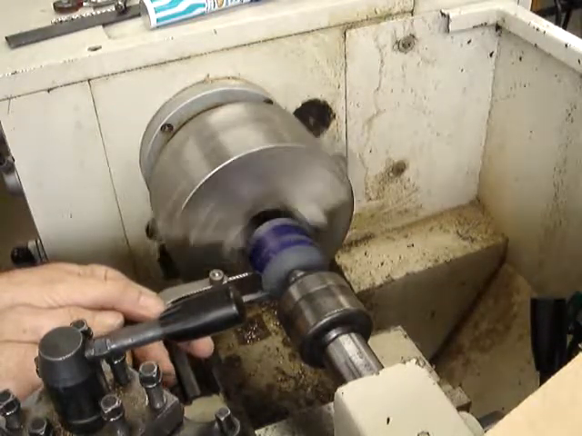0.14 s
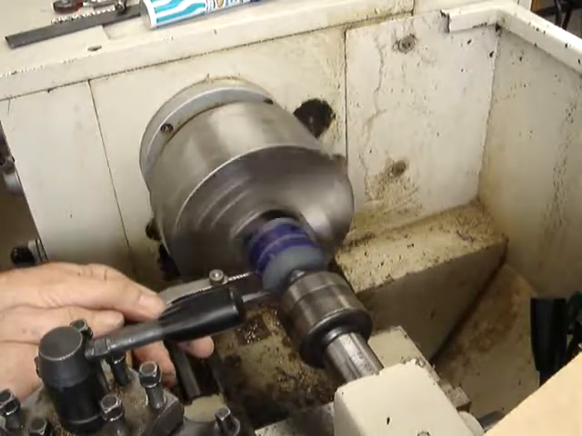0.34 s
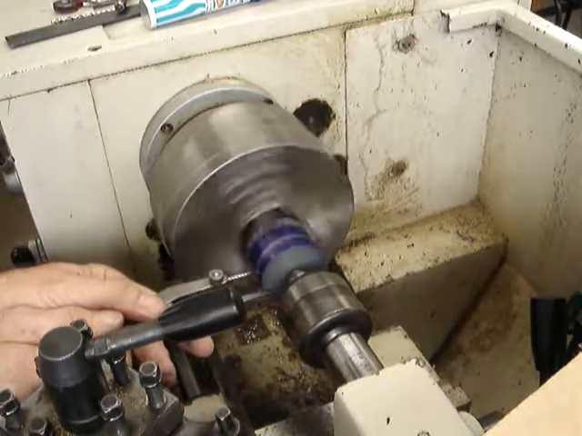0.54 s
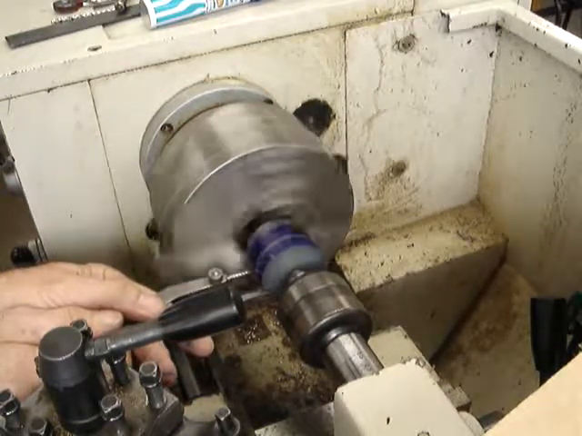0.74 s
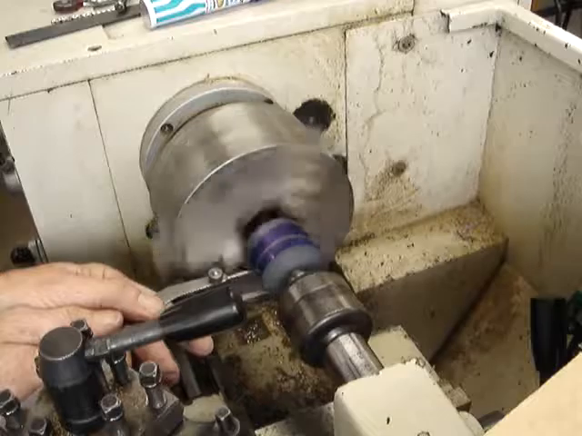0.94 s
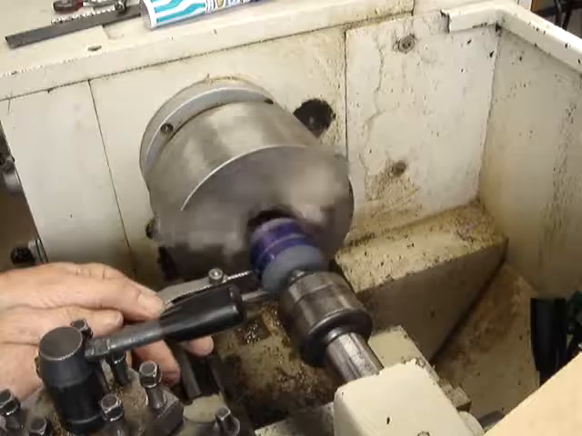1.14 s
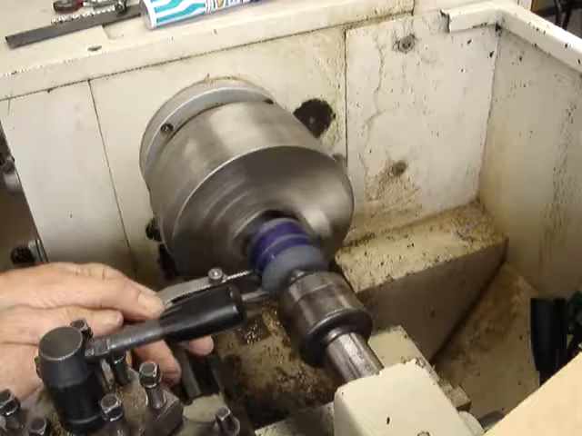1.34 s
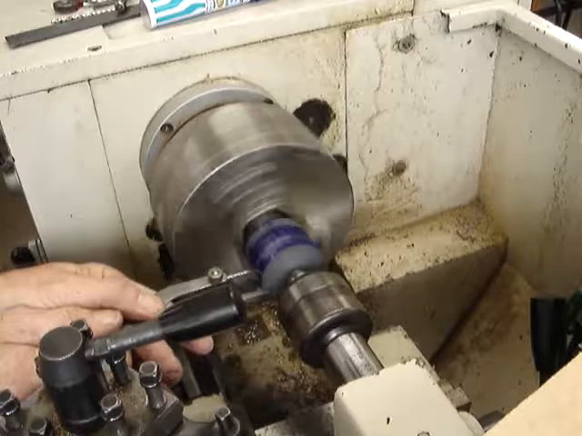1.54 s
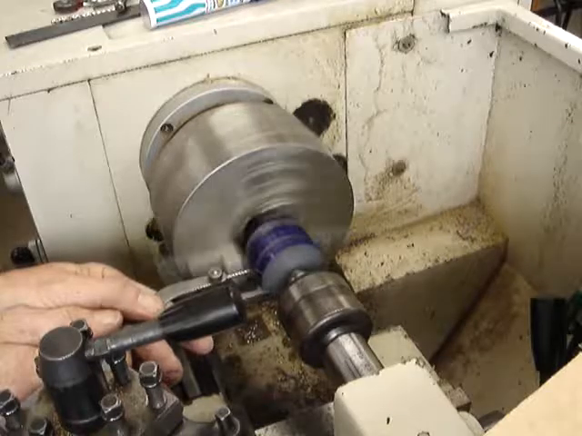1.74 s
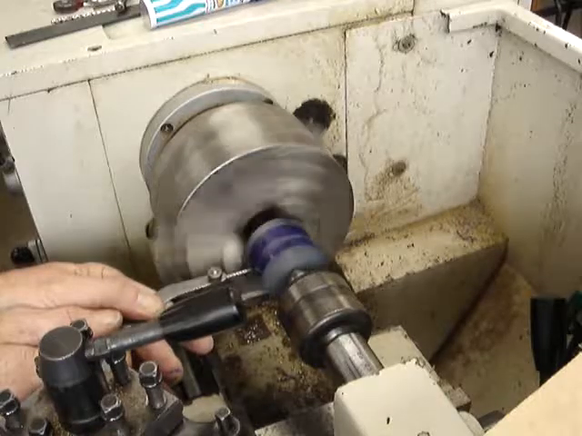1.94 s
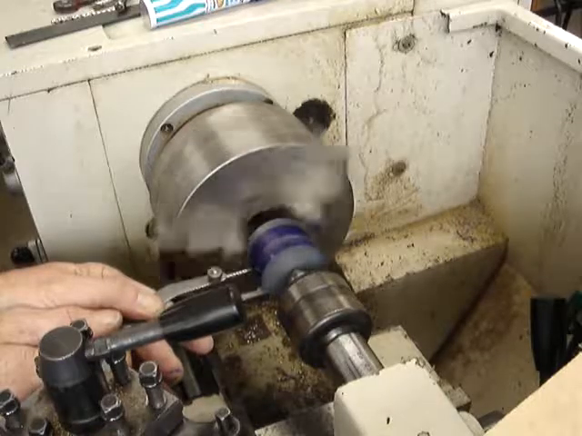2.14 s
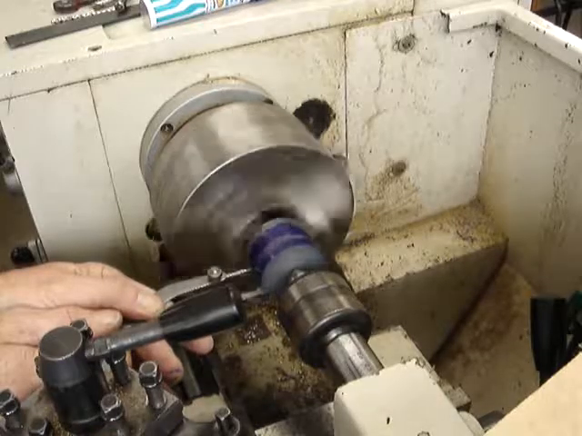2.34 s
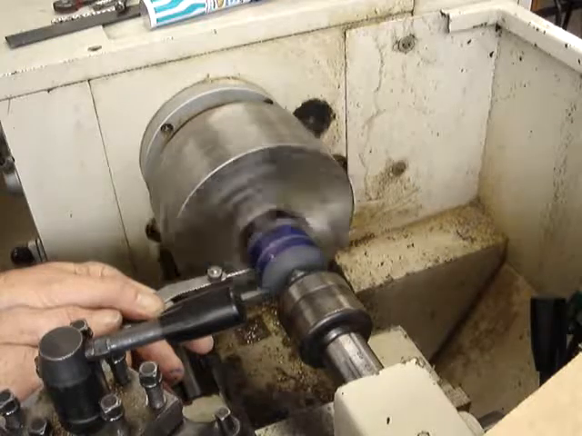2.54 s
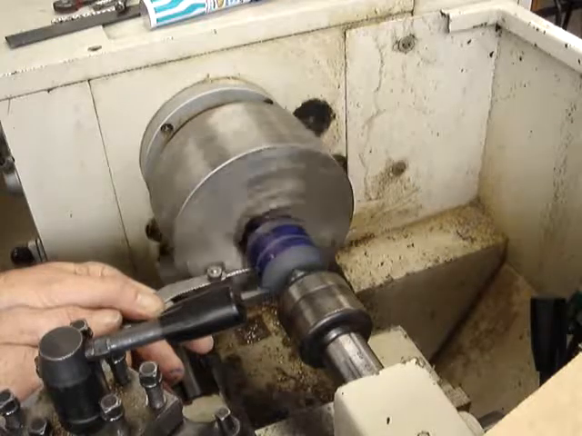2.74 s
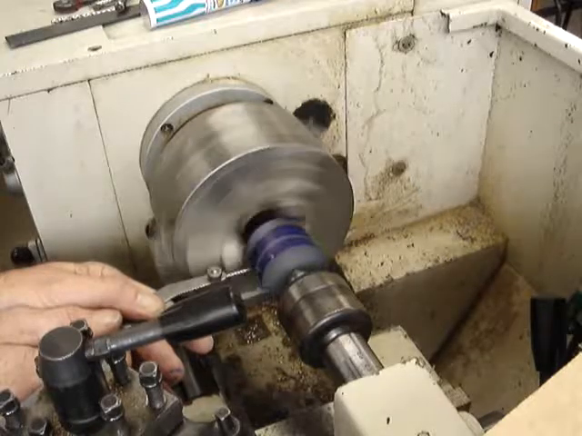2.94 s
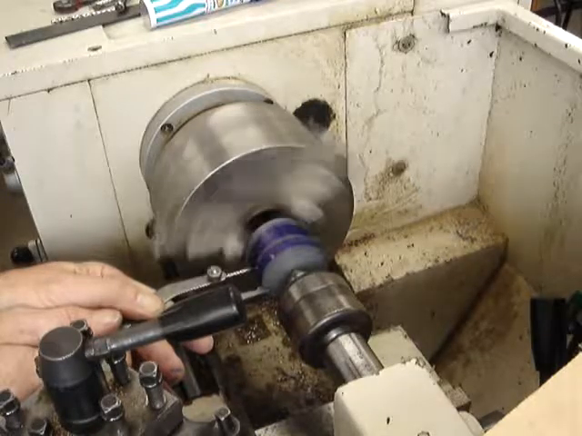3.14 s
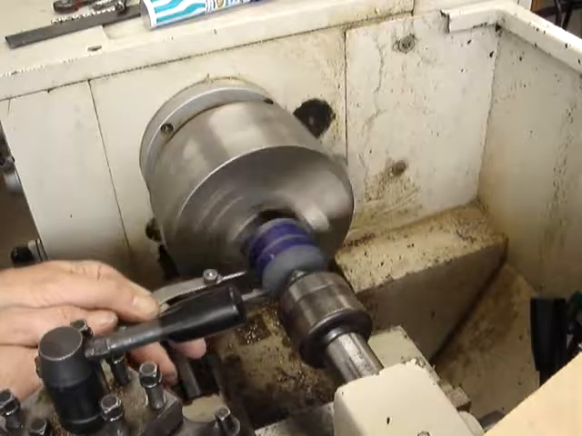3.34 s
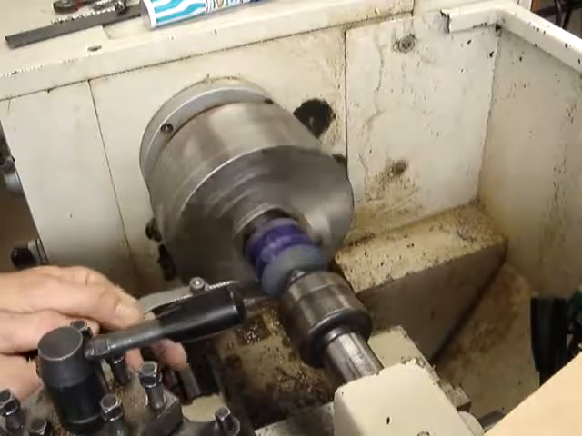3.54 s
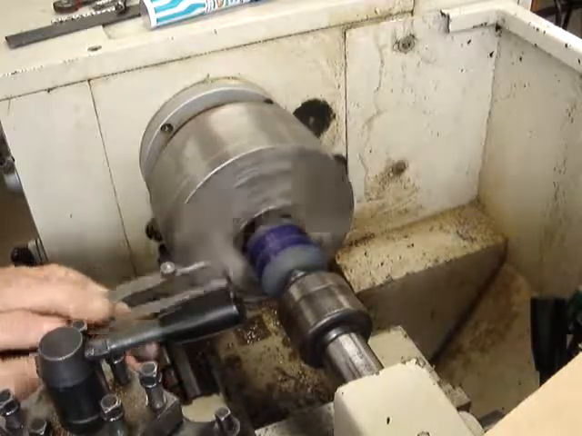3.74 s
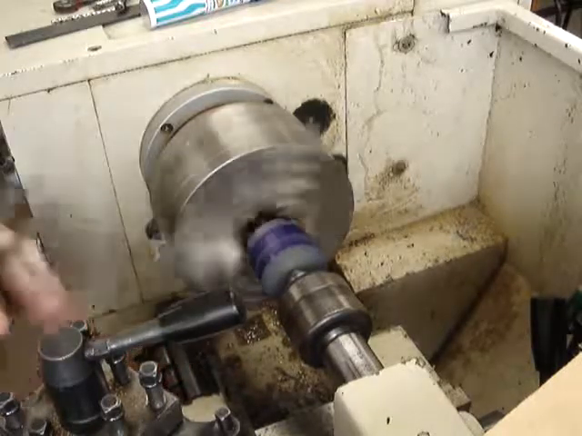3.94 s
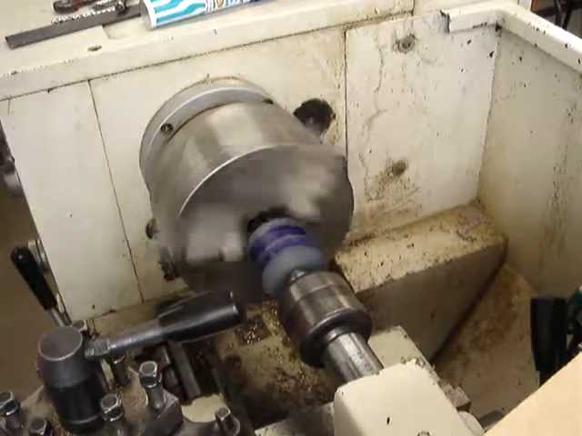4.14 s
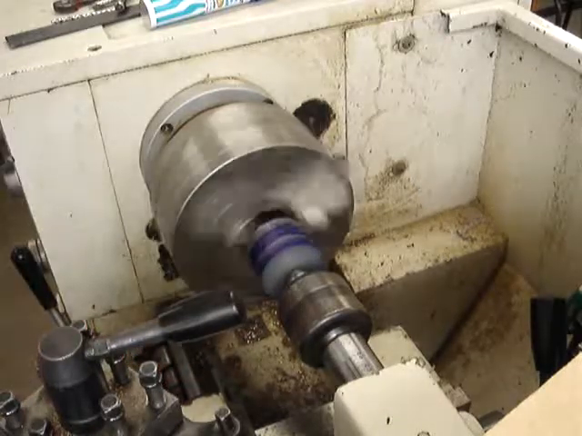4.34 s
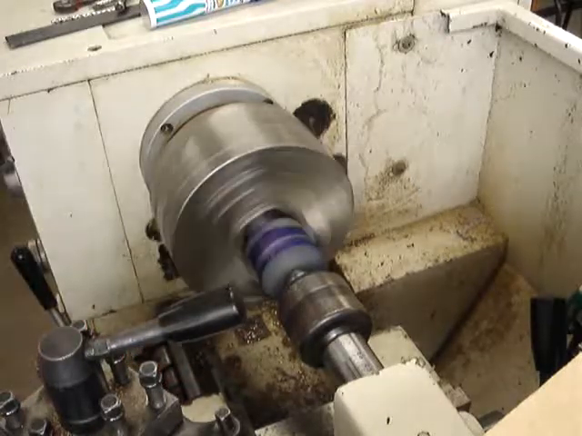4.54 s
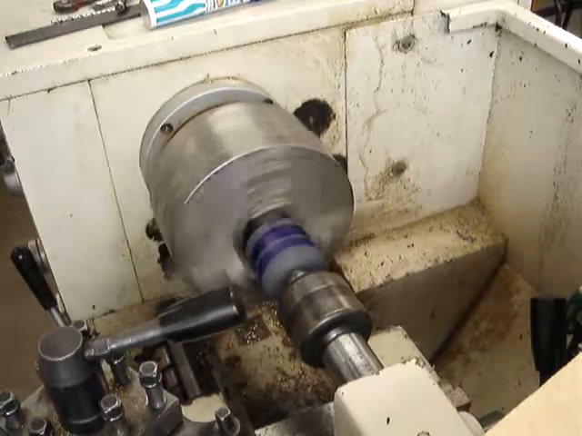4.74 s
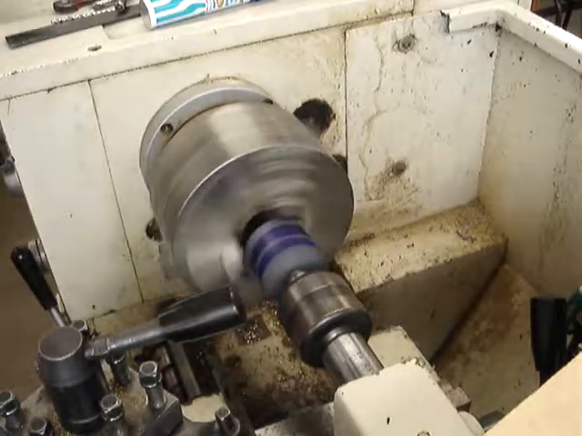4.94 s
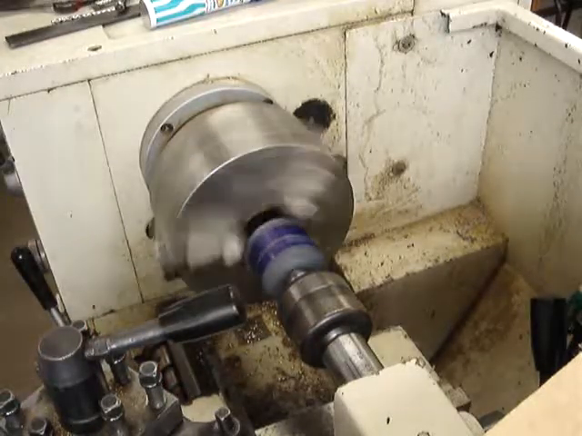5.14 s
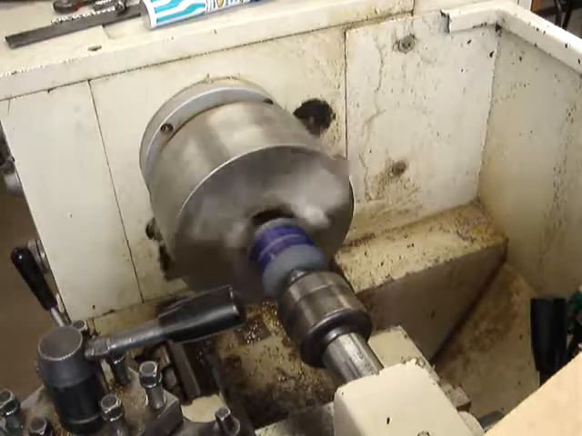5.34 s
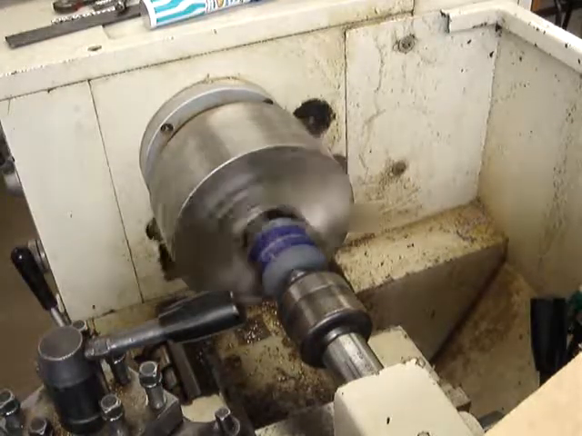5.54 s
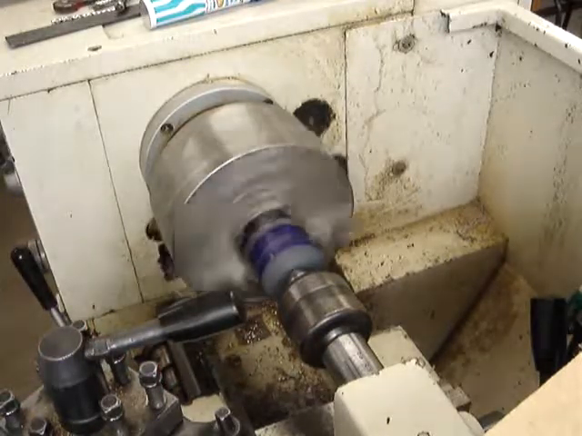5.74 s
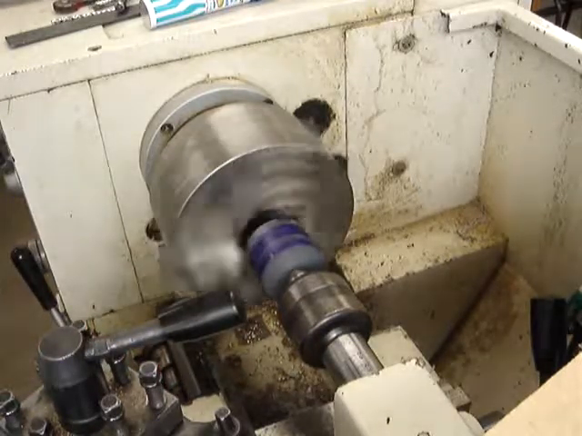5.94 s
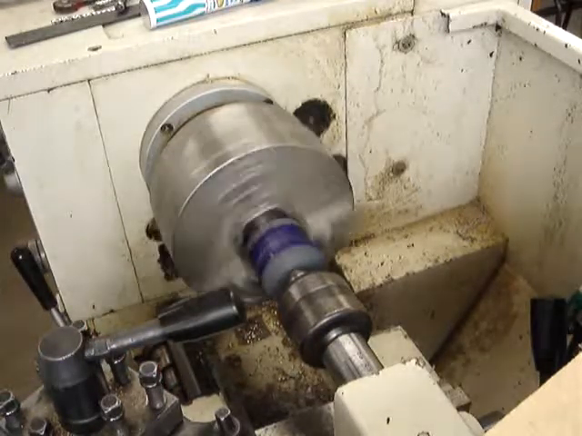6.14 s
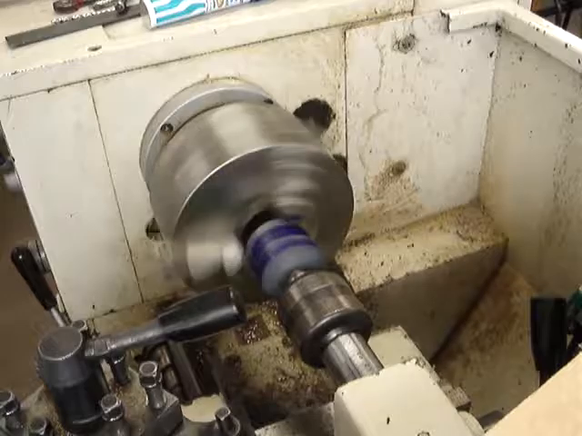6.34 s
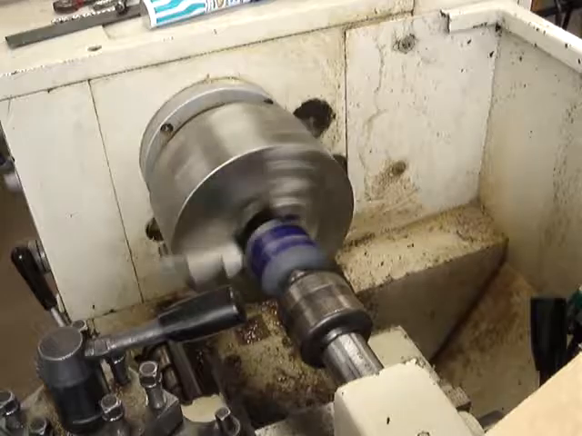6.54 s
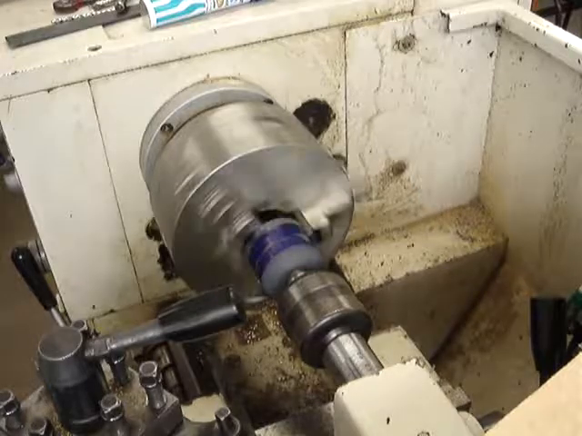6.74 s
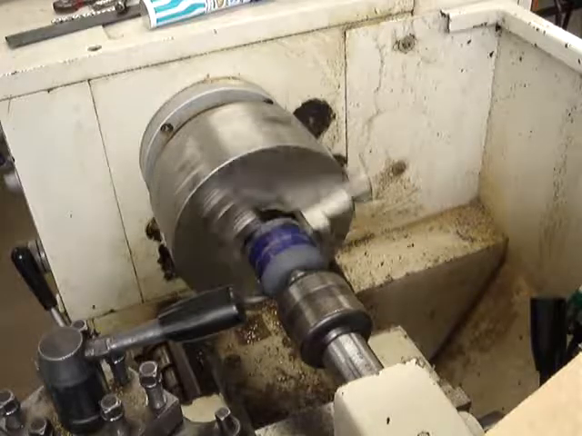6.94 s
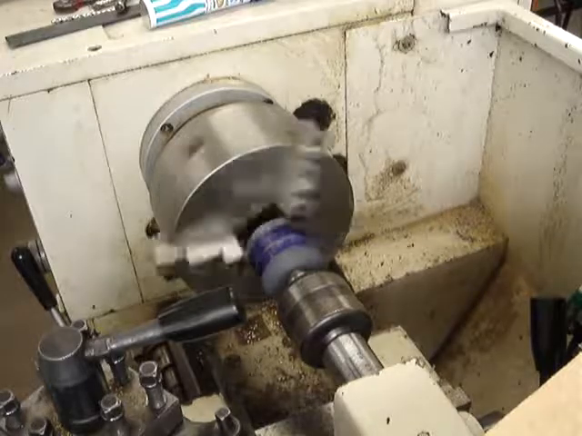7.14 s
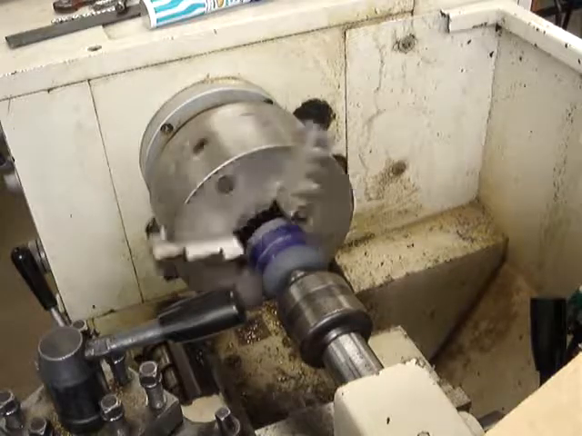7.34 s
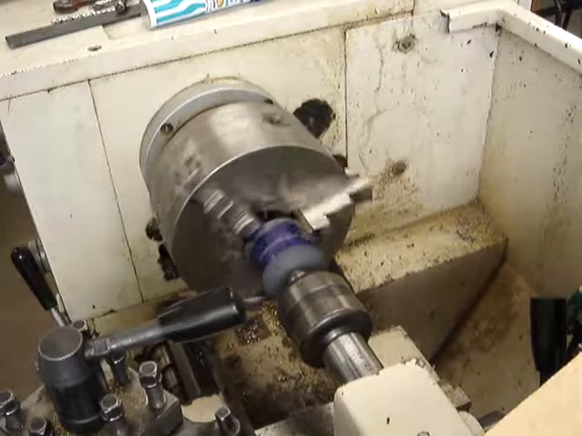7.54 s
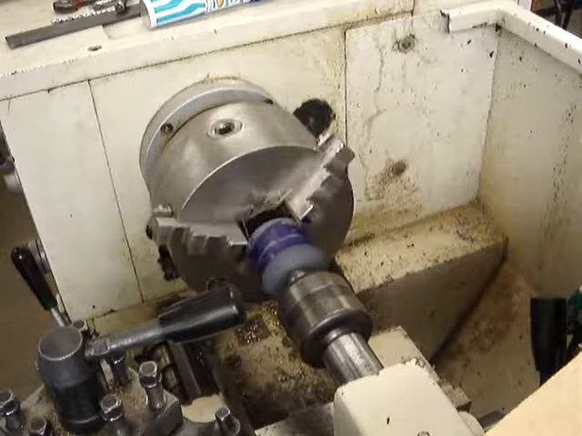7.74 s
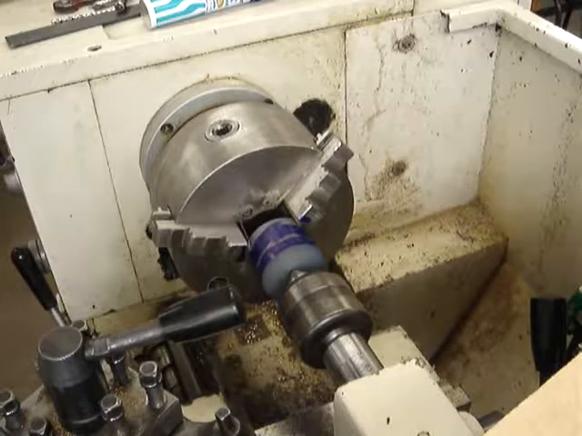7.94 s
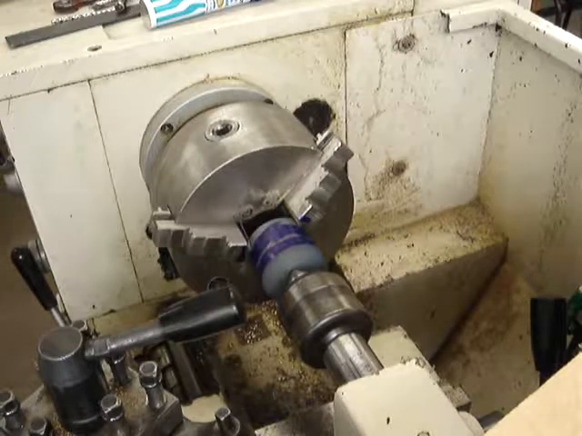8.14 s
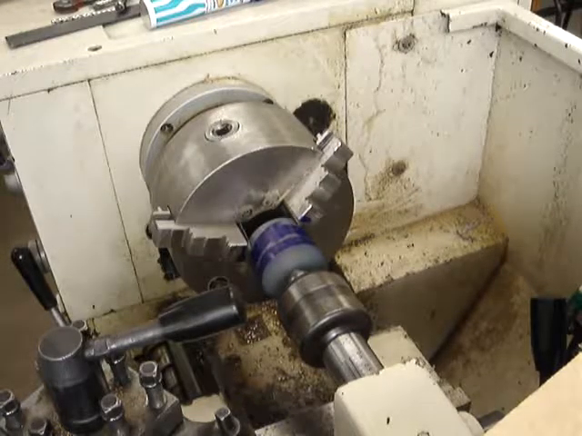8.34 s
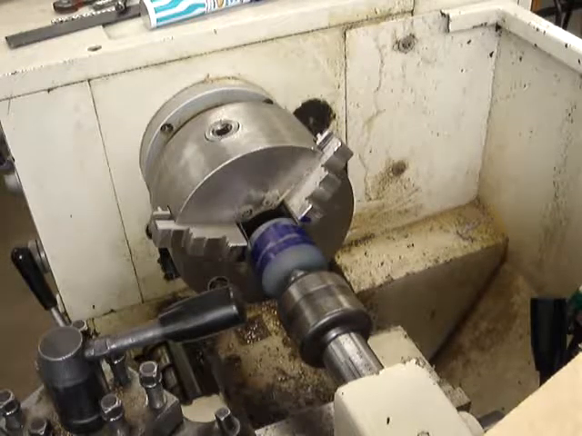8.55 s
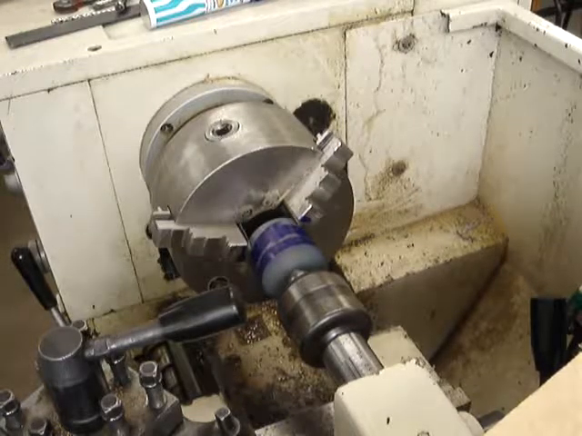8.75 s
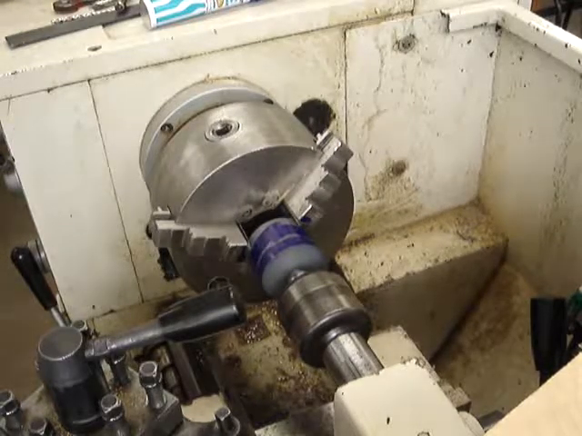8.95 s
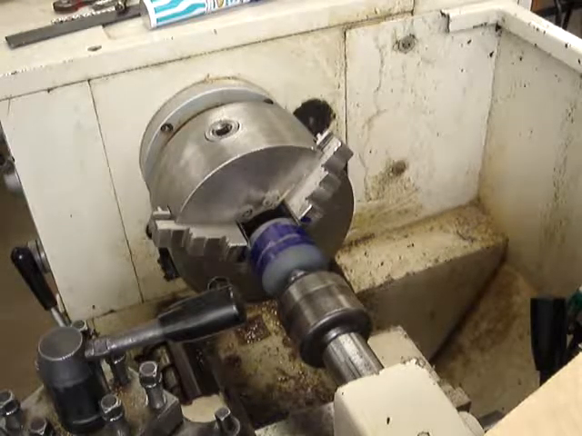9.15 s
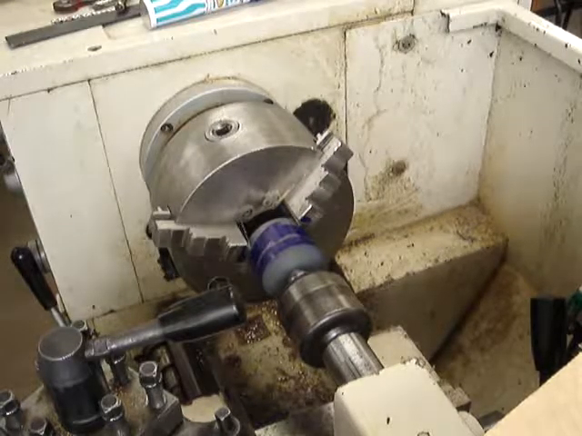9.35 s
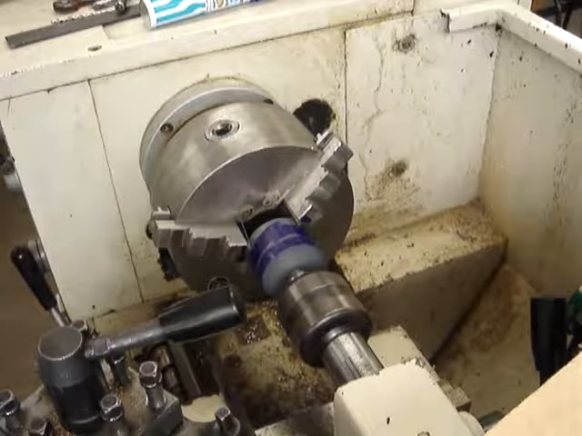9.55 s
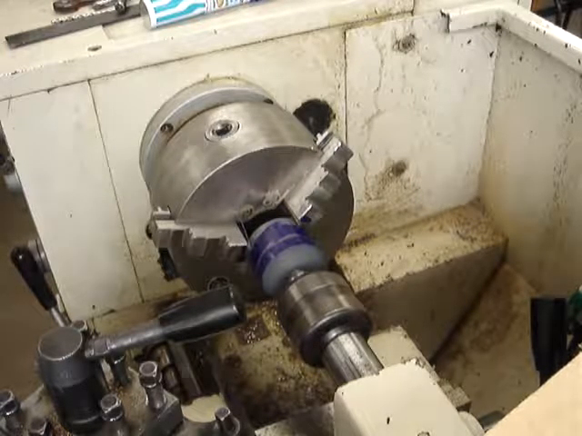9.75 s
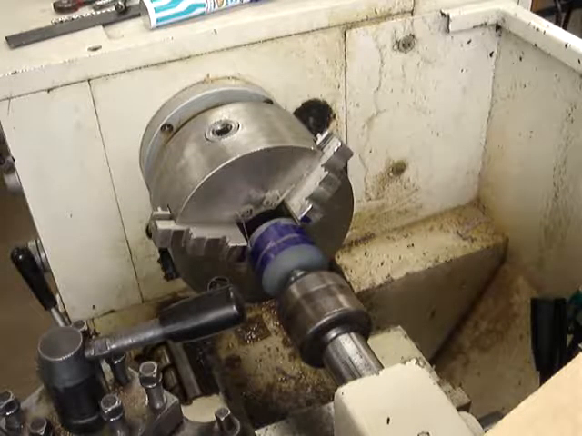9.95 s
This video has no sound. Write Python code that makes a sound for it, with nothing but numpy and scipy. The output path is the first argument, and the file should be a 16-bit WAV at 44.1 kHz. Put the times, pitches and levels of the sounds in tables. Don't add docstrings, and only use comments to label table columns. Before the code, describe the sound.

Steady harsh gear whine with ringing rattle and light ticking, a sharp switch click, a falling spin-down and brake scrape, then metallic knocks in a quiet workshop.

```python
import sys
import numpy as np
from scipy import signal
from scipy.fft import rfft, irfft, next_fast_len
from scipy.io import wavfile
from scipy.ndimage import uniform_filter1d

SR = 44100
rng = np.random.default_rng(int(sys.argv[2]) if len(sys.argv) > 2 else 0)


def invert_db(level):
    return 10 ** (np.asarray(level, dtype=float) / 20)


def put_to_file(sound):
    columns = np.atleast_2d(sound).T
    safe = np.clip(columns, -1, 1)
    whole_steps = np.round(safe * 32767)
    wavfile.write(sys.argv[1], SR, whole_steps.astype(np.int16))


N = 440107
T = np.arange(N) / SR
HZ = np.maximum(np.arange(N // 2 + 1) * SR / N, 1)
MESH_HZ = 296.08
BLOW_S = 8.8148

# (frequency [Hz], left-right likeness [-1 to 1])
LIKENESS = [(60, -0.8), (80, 0.12), (110, -0.39), (170, -0.79), (240, -0.22), (340, -0.96), (430, -0.57),
            (550, 0.0048), (700, 0.76), (2000, 0.76), (3400, 0.73), (5000, 0.07), (7000, -0.3)]


def rms_one(x):
    return x / np.sqrt(np.mean(x ** 2) + 1e-20)


def mid_rms_one(pair):
    return pair / pair.mean(axis=0).std()


def in_time(rows):
    s, *columns = np.transpose(rows)
    return [np.interp(T, s, c) for c in columns]


def at_hz(points, hz):
    table_hz, values = np.transpose(points)
    return np.interp(np.log(hz), np.log(np.maximum(table_hz, 1)), values)


def drift(rate_hz):
    r = np.exp(-40 * np.pi * rate_hz / SR)
    slow = signal.lfilter([1], [1, -2 * r, r * r], rng.standard_normal(N // 20 + 4002))[4000:]
    return np.interp(np.arange(N) / 20, np.arange(len(slow)), rms_one(slow))


def decay(start_s, peak_db, t60_s):
    return invert_db(peak_db - 60 * np.abs(T - start_s) / t60_s) * (T > start_s)


def resonance(x, hz, width_hz):
    r = np.exp(-np.pi * width_hz / SR)
    poles = [1, -2 * r * np.cos(2 * np.pi * hz / SR), r * r]
    return signal.lfilter([(1 - r * r) / 2, 0, (r * r - 1) / 2], poles, x + 1e-18)


def band(x, low_hz, high_hz):
    return signal.sosfilt(signal.butter(2, [low_hz, high_hz], "band", fs=SR, output="sos"), x)


def grit(flutter_db, rate_hz, apart):
    flutter = invert_db(flutter_db * drift(rate_hz))
    return flutter * (rng.standard_normal(N) + apart * rng.standard_normal((2, N)))


def two_ports(gain, alike_share, mid=None, side=None):
    # (frequency [Hz], left minus right [dB])
    lean_table = [(60, -1), (170, -3), (460, -2.5), (1280, -3), (3560, -3), (9880, -1.5)]
    if mid is None:
        mid, side = rng.standard_normal((2, N))
    alike = np.clip(alike_share * at_hz(LIKENESS, HZ), -1, 1)
    mid, side = rfft(mid) * np.sqrt(1 + alike), rfft(side) * np.sqrt(1 - alike)
    lean = invert_db(at_hz(lean_table, HZ) / 2)
    return gain * np.array([(mid + side) * lean, (mid - side) / lean])


def tones(cycles, rows, leads, wander_db):
    out = np.zeros((2, N))
    for (k, left_db, right_db), lead in zip(rows, leads):
        phase = 2 * np.pi * (k * cycles + rng.random())
        pair = np.array([invert_db(left_db) * np.sin(phase), invert_db(right_db) * np.sin(phase + lead)])
        out += invert_db(4 + wander_db * drift(19.0)) * pair
    return out


def ringing(level_db, hz, width_hz, alike, even=.3):
    held = resonance(resonance(rng.standard_normal((2, N)), hz, width_hz), hz, 3 * width_hz)
    mid, side = held / (uniform_filter1d(held ** 2, size=500) + 1e-12) ** even
    alike = np.clip(alike, -1, 1)
    mid = np.sqrt(1 + alike) * mid / mid.std()
    side = np.sqrt(1 - alike) * side / side.std()
    return invert_db(level_db) * mid_rms_one(np.array([mid + side, mid - side])) * invert_db([[-1.5], [1.4]])


def chirp(s, length_s, hz, db, width_hz, edge_s):
    window = np.clip(np.minimum(T - s + edge_s, s + length_s + 2 * edge_s - T) / edge_s / 2, 0, 1)
    span = slice(int((s - .1) * SR), int((s + length_s + .1) * SR))
    noise = rng.standard_normal(span.stop - span.start)
    held = resonance(resonance(noise, hz, width_hz), hz, 2 * width_hz)
    out = np.zeros(N)
    out[span] = rms_one(held / (uniform_filter1d(held ** 2, size=500) + 1e-12) ** .35)
    return invert_db(db) * window * out


def bursts(rows, edges_hz):
    out, bare = np.zeros((2, N))
    white = rng.standard_normal(N)
    bands = [rms_one(band(white, *edges)) for edges in edges_hz]
    for s, peak_db, second_db, third_db, t60_s in rows:
        span = slice(int(s * SR), min(int((s + .6) * SR), N))
        age = T[span] - T[span.start]
        crack = (1 - np.exp(-age / 0.00071)) * (1 + 1.67 * np.exp(-age / 0.0082))
        shape = invert_db(peak_db - 15.0 - 60 * age / max(t60_s, .005)) * crack
        out[span] += shape * sum(invert_db(db) * b[span] for db, b in zip((0, second_db, third_db), bands))
        bare[span] += shape * white[span]
    return out, bare


def casing_gain(hz, base_db):
    # (frequency [Hz], width [Hz], level [dB])
    casing = [(330, 10, -20), (366, 27, -0.5), (390, 4, -3.5), (437, 33, -3), (598, 11, 2.5),
              (676.5, 11, 1.5), (719, 10, 0.5), (788, 66, -6), (847, 55, -8), (932, 9, 3.5),
              (978, 14, -16.5), (1050, 19, -3), (1194, 56, -6), (1336, 47, 0), (1465, 46, 2.5),
              (1655, 17, 1.5), (1740, 12, 1), (1892, 39, 0), (2070, 90, -4), (2220, 29, -2.5),
              (2394, 83, -4), (2650, 32, -0.5), (2787, 39, -2), (3050, 10, 2), (3740, 100, -8),
              (7580, 65, -17.5)]
    modes = sum(invert_db(2 * db) / (1 + (2 * (hz - top) / width) ** 2) for top, width, db in casing)
    return np.sqrt(invert_db(2 * base_db) + modes)


def whine(turn, current):
    # (multiple [1], left [dB], right [dB])
    mesh = [(1, -45.3, -34.3), (2, -35.8, -30.5), (3, -44.5, -38.9), (4, -38.3, -33.1), (5, -26.6, -23.2),
            (6, -45.2, -46.4)]
    # (multiple [1], left [dB], right [dB])
    idler = [(1, -34.4, -41.4), (2, -46.6, -41.3), (3, -52, -43), (4, -38, -31.3), (5, -47, -37)]
    # (frequency [Hz], left [dB], right [dB])
    hum = [(75.4, -62.8, -62.5), (86.1, -61.2, -51.4), (100.1, -48.8, -43.6), (150.3, -44.7, -44.1),
           (200, -34.5, -31.1), (207.3, -42.6, -38.4), (300.1, -42.0, -29.4), (325, -42.5, -37.9),
           (400, -43.2, -35.6), (500, -46.3, -39.2)]
    mesh_lead = [3, -.8, -.1, -.8, .3, .4]
    idler_lead = [.4, -.3, -.1, .05, .1]
    hum_lead = [-2.8, .45, .8, -3.1, 3.04, 2.95, 2.6, 2.2, -.1, -1.7]
    spindle_hz, idler_mesh_hz = 7.402, 284.95
    swell = 1 + .13 * np.sin(2 * np.pi * spindle_hz * turn + 1.3)
    gears = tones(MESH_HZ * turn, mesh, mesh_lead, wander_db=.7) * swell
    gears = gears + tones(idler_mesh_hz * turn, idler, idler_lead, wander_db=1.5)
    return current * (gears + tones(T, hum, hum_lead, wander_db=1.2))


def coasting(turn, speed):
    # (time [s], level [dB])
    coast = [(6.06, -72), (6.09, -38), (6.2, -33), (6.45, -33), (6.65, -38), (6.9, -45), (7.1, -52),
             (7.5, -68), (7.8, -98)]
    # (time [s], level [dB])
    tooth_beat = [(6.1, -70), (6.2, -49), (6.36, -46), (6.44, -43), (6.52, -39), (6.6, -43), (6.72, -46),
                  (6.85, -55), (7.0, -70)]
    out = 0
    for k, db in ((1.25, -15), (2, -11.5), (3, -11), (3.85, -5.5), (4, -7.5), (5, 6.5), (6, 1)):  # (multiple, dB)
        flare = casing_gain(k * MESH_HZ * speed[::50], base_db=-11).repeat(50)[:N] ** 1.2
        phase = 2 * np.pi * k * MESH_HZ * turn + .8 * drift(12) + .35 * drift(45)
        broken = invert_db(2.5 * drift(20)) * np.sin(phase)
        out = out + invert_db(db) * flare * broken / (1 + (k * MESH_HZ * speed / 1560) ** 24)
    beat = invert_db(in_time(tooth_beat)[0] + 1.5 * drift(12))
    beat = beat * np.sin(2 * np.pi * MESH_HZ * turn + 0.76 * drift(10))
    beat = beat * (T > tooth_beat[0][0]) * (T < tooth_beat[-1][0])
    return (invert_db(in_time(coast)[0] + 6.5) * out + beat) * invert_db([[-2], [1.5]])


def surges():
    # (time [s], rattle lift [dB], large wheel lift
    # [dB], small wheel lift [dB])
    surge_rows = [(0.175, 1, 8, 5), (0.465, 1.5, 2.5, 6), (0.58, 2.5, -5, 2), (0.87, 3, 12, 6),
                  (0.97, 2, 7, -4), (1.25, 2, 2, 7), (1.37, 1.5, -1, 2), (1.51, 1, 0, 7), (1.745, 2, 5, 10),
                  (1.96, 1, -13, -2), (2.14, 4, 15, 6), (2.41, 2.5, 0, 3), (2.49, 4.5, 1, 4),
                  (2.85, 2, 9, 11), (2.94, 1, -3, 6), (3.19, 2.5, 4, 5), (3.28, 2, 3, 10),
                  (3.51, 0.5, 0, 3), (3.63, 0.5, 3, 6), (3.74, 2.5, 6, 5), (4.07, 5, 14, 9),
                  (4.36, 0, 2, 8), (4.44, 6.5, 7, 0), (4.74, 2.5, 3, 3), (4.84, 4, 5, 5),
                  (5.01, 0, 1, -5.5), (5.185, 4, 19, 0), (5.515, 3.5, 10, 5), (5.77, -0.5, 15, -2),
                  (6.03, 3.5, 8, 8),
                  (6.33, 0.94, 6.7, 13.5), (6.485, -1, 5.5, 2), (6.83, 3, 4, -3), (7.0, -3, 2.5, 1),
                    (7.09, -3, 5, -14)]
    rise_s, fall_s = 0.053, 0.048
    rows, coarse = np.array(surge_rows), T[::50]
    age = coarse - rows[:, :1]
    lifts = rows[:, 1:].T @ np.exp(-(age / np.where(age < 0, rise_s, fall_s)) ** 2)
    return [np.interp(T, coarse, lift) for lift in lifts]


def rattle(turn, strength_db, bite_db, lift_db):
    # (frequency [Hz], density [dB per Hz])
    colour = [(40, -32), (75, -41.5), (120, -23), (170, -12.5), (250, -19), (330, -7.5), (520, -15.5),
              (900, -6), (1500, -9), (3400, -8), (4300, -16.5), (5800, -27), (7700, -25), (9900, -30.5)]
    # (level at rest value [dB], share of strength [1], share of bite [1], share of surge [1])
    ranges = [(-33.5, 0.8, 1.56, 0.35), (-30, 1.11, 0.21, 0.73), (-28, 1.43, 2.3, 0.86),
              (-34, 0.89, 5.95, 1)]
    gate = invert_db(0.97 * drift(200) + .4 * drift(9)) * (1 + 0.088 * np.cos(2 * np.pi * MESH_HZ * turn))
    mid, side = gate * rng.standard_normal((2, N))
    gain = invert_db(at_hz(colour, HZ)) * casing_gain(HZ, base_db=-10.0)
    spectrum = two_ports(gain, 0.94, mid, side)
    spans_hz = ((310, 580), (620, 1100), (1600, 3300), (3500, 4900))
    place = at_hz([(520, 0), (680, 1), (1200, 1), (1800, 2), (3000, 2), (3800, 3)], HZ)
    out = 0
    for k, (db, follows, bites, surge) in enumerate(ranges):
        low_hz, high_hz = spans_hz[k]
        level_db = db + follows * strength_db + bites * bite_db + surge * lift_db
        part = irfft(spectrum * np.clip(1 - abs(place - k), 0, 1), N)
        heard = irfft(spectrum.mean(axis=0) * ((HZ >= low_hz) & (HZ < high_hz)), N)
        out = out + invert_db(level_db + 1.48 + 0.76 * drift(15)) * part / heard.std()
    return out


def flares(rows):
    rise_s, fall_s = .022, .034
    s, db = np.transpose(rows)[:, :, None]
    age = T[::50] - s
    power = invert_db(2 * db) * np.exp(-(age / np.where(age < 0, rise_s, fall_s)) ** 2)
    return np.interp(T, T[::50], power.max(axis=0))


def wheels(speed, strength_db, bite_db, lifts_db):
    # (frequency [Hz], width [Hz], evenness [0-0.5])
    wheel_modes = [(3391, 17, .46), (4992, 50, .25), (5200, 420, .3), (4870, 90, .15), (6819, 14, .46),
                   (9070, 45, .3)]
    # (level [dB], share of strength [1], share of bite [1], share of surge [1], flutter [dB])
    large_wheel = [(-49, 1.3, 0.7, 0.3, 1.6), (-50, 0.52, 1.9, 0.45, 1.2), (-52, 1.2, 1.2, 0.47, 1.2),
                   (-53, .8, 1.2, .4, 1.2)]
    # (level [dB], share of strength [1], share of bite [1], share of surge [1], flutter [dB])
    small_wheel = [(-58, 1.3, 1.1, 0.35, 1.6), (-59, 1.7, 1.6, 0.55, 1.8)]
    ring_loss_db = [5, 16, 6, 12, 3.5, 6]
    # (time [s], peak [dB])
    large_flares = [(0.034, -27), (0.166, -26.5), (0.465, -32.3), (0.556, -28.5), (0.902, -21),
                    (1.007, -25.5), (1.306, -24.5), (1.472, -30), (1.628, -25.5), (1.703, -26),
                    (1.805, -31), (2.034, -33), (2.159, -31), (2.22, -27.5), (2.374, -34), (2.823, -28),
                    (3.086, -30), (3.195, -27), (3.24, -24), (3.463, -26), (3.626, -21.5), (3.796, -30.5),
                    (3.85, -27), (3.923, -28.5), (3.986, -26), (4.079, -26), (4.19, -33), (4.329, -28),
                    (4.406, -24.5), (4.825, -29), (4.991, -31), (5.188, -20), (5.29, -25), (5.379, -29),
                    (5.551, -21), (5.662, -26.5), (5.751, -28), (5.905, -22.5), (6.011, -22.5),
                    (6.073, -31), (6.19, -28.5), (6.293, -23.5), (6.365, -23), (6.512, -27.5),
                    (6.821, -36.5), (6.905, -51), (7.005, -36), (7.066, -36)]
    # (time [s], peak [dB])
    small_flares = [(0.066, -40), (0.116, -38), (0.2, -36), (0.263, -42), (0.336, -42), (0.406, -45.4),
                    (0.485, -38.5), (0.776, -46.7), (0.934, -38.5), (1.102, -42), (1.168, -42),
                    (1.311, -41), (1.644, -39), (1.714, -39), (1.98, -40), (2.054, -39), (2.179, -40),
                    (2.383, -52), (2.501, -39), (2.585, -44), (2.955, -34), (3.091, -40), (3.138, -41),
                    (3.295, -45), (3.374, -42), (3.633, -35), (3.753, -41), (4.088, -41), (4.236, -43),
                    (4.315, -40), (4.399, -38.5), (4.737, -45.7), (4.834, -36), (5.209, -42), (5.338, -43),
                    (5.603, -45), (5.771, -39), (6.023, -37.5), (6.367, -37.5), (6.44, -40), (6.524, -46),
                    (6.868, -51)]
    counts = [len(large_wheel), len(small_wheel)]
    strikes = {0: flares(large_flares), counts[0]: flares(small_flares)}
    stop_db = 45 * np.maximum(T - 7.15, 0)
    mode_lifts_db = np.repeat(lifts_db, counts, axis=0)
    out = 0
    for k, (db, follows, bites, surge, flutter_db) in enumerate(large_wheel + small_wheel):
        hz, width_hz, even = wheel_modes[k]
        level_db = db + follows * strength_db + bites * bite_db + surge * mode_lifts_db[k]
        level_db = level_db + flutter_db * 2.4 * np.tanh(2 * drift(22)) - ring_loss_db[k] * (1 - speed)
        gain = np.sqrt(invert_db(2 * (level_db + 8.0 - stop_db)) + strikes.get(k, 0))
        out = out + gain * ringing(0, hz, width_hz, at_hz(LIKENESS, hz), even)
    return out


def brake():
    start_s, hold_s, attack_s, release_s = 7.09, 0.063, 0.056, 0.047
    level_db, hz, width_hz = -32, 3780, 810
    early, late = np.maximum(start_s - T, 0), np.maximum(T - start_s - hold_s, 0)
    scrape = resonance(resonance(grit(2.2, 70, 0.97), hz, width_hz), hz, width_hz)
    return invert_db(level_db) * np.exp(-early / attack_s - late / release_s) * rms_one(scrape)


def bench(strength_db, bite_db):
    # (time [s], peak [dB], t60 [s])
    thumps = [
        (6.097, -42, 0.58),
        (8.813, -50, 0.23),
    ]
    # (time [s], length [s], frequency [Hz], level [dB])
    bed_ring = (6.1, .11, 90, -45)
    # (time [s], length [s], frequency [Hz], level [dB])
    bed_settle = (7.14, .12, 84, -55)
    # (time [s], length [s], frequency [Hz], level [dB])
    casing_hum = (7.25, .55, 1330, -57)
    shudder_colour = [(50, -21), (90, -13.5), (150, -5), (200, 2.0), (280, 1.0), (300, -45)]  # (Hz, dB)
    shudder = mid_rms_one(irfft(two_ports(invert_db(at_hz(shudder_colour, HZ)), 0.82), N))
    shudder = invert_db(-41.5 + 0.6 * strength_db + 0.96 * bite_db) * np.clip((T - 6.05) * 10, 0, 1) * shudder
    deep = rms_one(band(rng.standard_normal(N), 25, 110))
    out = shudder + sum(decay(*row) for row in thumps) * deep
    out = out + chirp(*bed_ring, width_hz=6.0, edge_s=.025)
    out = out + chirp(*bed_settle, width_hz=6.5, edge_s=0.033)
    return out + chirp(*casing_hum, width_hz=68, edge_s=0.035)


def levers():
    # (time [s], peak 4.3-8.1 kHz [dB], 1.9-2.4 kHz relative [dB], lows relative [dB], t60 [s])
    ticks = [(6.049, -31, -7, -12, 0.05), (6.0567, -11, -14, -14, 0.06), (6.069, -27, -12, -14, 0.11),
             (6.1108, -29, 25, -21, 0.04), (6.808, -40.5, 24, -8, 0.053), (6.856, -27.5, 9.5, -13, 0.18),
             (6.8624, -19, 6, -11, 0.09), (6.878, -21, -2, -16, 0.14), (6.893, -45, 8, -11, 0.23)]
    return bursts(ticks, ((4300, 8100), (1940, 2350), (40.3, 1800)))[0]


def caliper():
    # (time [s], peak [dB])
    brush = [(0, -19), (.8, -19.5), (1.3, -26.5), (2.8, -32)]
    start_s, gap_s = .0174, .12465
    times = np.arange(start_s, brush[-1][0], gap_s)
    levels_db = np.interp(times, *np.transpose(brush)) + rng.normal(0, 0.64, len(times))
    rows = [(s, db, -1, -30, .03) for s, db in zip(times, levels_db)]
    return bursts(rows, ((5200, 8200), (4300, 5500), (1000, 4300)))[0]


def hand_wheel():
    # (time [s], peak 6.5-9.2 kHz [dB], 5.05-5.4 kHz relative [dB], lows relative [dB], t60 [s])
    nudges = [(5.199, -16, -24, -28.5, 0.04), (5.212, -36, -8, -22, .05), (5.276, -23, -1, -26, .04),
              (5.432, -24, -7, -32, .03), (5.5063, -18.5, -3, -27, 0.05)]
    # (time [s], length [s], frequency
    # [Hz], level [dB])
    chirp_rows = [(5.272, .02, 7750, -46), (5.33, .05, 7760, -45), (5.385, .06, 7740, -39),
                  (5.445, .04, 7680, -44), (5.34, .025, 5780, -44), (5.42, .035, 5760, -44),
                  (5.42, .06, 8670, -43), (5.375, .075, 9750, -48), (5.505, .015, 7720, -39),
                  (5.51, .05, 7420, -43), (5.51, .015, 5750, -42), (5.537, .015, 5800, -43),
                  (5.53, .03, 8420, -47), (5.465, .02, 5780, -45), (5.72, .035, 5830, -43),
                  (5.28, .03, 8750, -48), (5.21, .015, 8650, -47), (5.36, .04, 5950, -48),
                  (6.11, .012, 2800, -28), (6.112, .012, 4000, -33)]
    start_s, length_s = 5.26, .3
    within = np.clip(np.minimum(T - start_s, start_s + length_s - T) * 20, 0, 1)
    chatter = invert_db(-50 + 4 * drift(60)) * within * rms_one(band(rng.standard_normal(N), 7200, 10000))
    chirps = sum(chirp(*row, width_hz=90, edge_s=.005) for row in chirp_rows)
    return bursts(nudges, ((6500, 9200), (5050, 5400), (40, 1800)))[0] + chirps + chatter


def tray():
    # (time [s], peak 1.6-4.2 kHz [dB], above 5 kHz relative [dB], 0.4-2.2 kHz relative [dB], t60 [s])
    knocks = [(7.5987, -35, 7.5, -1, 0.051), (7.756, -49.5, 5, -14, 0.19), (7.8518, -46, -19, 15, 0.17),
              (8.105, -38.5, -24, 2.5, 0.057), (8.2067, -49, 5, -18, 0.077), (8.2594, -75, 5, -3, 0.12),
              (8.4064, -51, 10, -12, 0.047), (8.42, -51, 3, -17, 0.12), (8.4537, -51, -23, -11, 0.09),
              (8.526, -60, -12, 15, 0.084), (8.543, -39, -27, 3.5, 0.093), (8.6695, -45, -23, -12, 0.051),
              (8.6732, -33, -34, -4, 0.063), (8.7163, -33, 3, 0, 0.16), (8.8635, -37, -10, 3.5, 0.13),
              (9.2075, -55, -23, 11, 0.13), (9.3196, -39, -24.5, -7, 0.11)]
    # (time [s], peak 1.6-4.2 kHz [dB], above 5 kHz relative [dB], 0.4-2.2 kHz relative [dB], t60 [s])
    drops = [
        (8.8102, -27.5, -30, -5, .1),
        (8.815, -18, -50, -33, 0.1),
        (9.3334, -27.5, -31, -3.5, 0.07),
    ]
    # (frequency [Hz], width [Hz], level [dB])
    tray_modes = [(1150, 500, -12), (2020, 300, -1), (2750, 400, -5), (3900, 400, 0), (4400, 450, -4),
                  (5000, 500, -8), (5800, 500, -6), (6500, 500, -3)]
    # (time [s], peak [dB])
    key_hits = [(8.103, -48), (8.455, -57), (8.673, -40), (8.722, -39), (9.212, -58), (9.335, -43)]
    key_hz, key_t60_s = 2845, 0.27
    edges_hz = ((1600, 4200), (5000, 10000), (400, 2200))
    light, light_bare = bursts(knocks, edges_hz)
    hard, hard_bare = bursts(drops, edges_hz)
    bare = hard_bare + invert_db(4.5) * band(light_bare, 530, 4100)
    sheet = invert_db(13) * sum(invert_db(db) * resonance(bare, hz, width_hz) for hz, width_hz, db in tray_modes)
    key = sum(decay(s, db, key_t60_s) for s, db in key_hits)
    key = key * np.sin(2 * np.pi * key_hz * T + .9 * drift(45)) * invert_db(2 * drift(70))
    return light + hard + sheet + key


def tool_bodies():
    # (time [s], frequency [Hz], peak [dB], t60 [s])
    bodies = [(7.5995, 3300, -36, .05), (7.6, 5600, -42, .03), (8.102, 2400, -42, .04),
              (8.4537, 1750, -46, .04), (8.455, 2900, -50, .05), (8.545, 1750, -38, .05),
              (8.546, 2250, -39, .045), (9.2105, 2000, -49, .04), (9.212, 2800, -50, .04),
              (8.796, 290, -46, .05), (9.335, 580, -50, .09), (9.334, 6300, -36, .05),
              (9.334, 2950, -35, .04), (7.852, 2500, -46, .05), (8.717, 2000, -38, .04),
              (8.717, 3500, -38, .04), (8.868, 1750, -36, .04)]
    return sum(decay(s, db, t60_s) * np.sin(2 * np.pi * hz * (T - s)) for s, hz, db, t60_s in bodies)


def settling_rod():
    # (time [s], peak [dB], first pitch [Hz], last pitch [Hz], sag [s], t60 [s])
    roll = (8.718, -40, 1150, 870, .02, .16)
    s, db, first_hz, last_hz, sag_s, t60_s = roll
    pitch_hz = last_hz + (first_hz - last_hz) * np.exp(-np.maximum(T - s, 0) / sag_s)
    phase = 2 * np.pi * np.cumsum(pitch_hz) / SR + .6 * drift(60)
    return decay(s, db, t60_s) * invert_db(4.0 * drift(80)) * np.sin(phase)


def clank():
    # (frequency [Hz], level [dB])
    clank_modes = [(1980, -15.5), (2900, -14), (3850, -12), (4150, -14), (4900, -16), (5800, -15),
                   (6500, -12), (6850, -20)]
    t60_s = .03
    age = np.maximum(T - BLOW_S, 0)
    out = 0
    for k, (hz, db) in enumerate(clank_modes):
        out = out + invert_db(db - 60 * age / t60_s) * np.sin(2 * np.pi * hz * age) * (-1) ** k
    return out


def jangle():
    jangle_hz = [1950, 2860, 3400, 4200, 4690, 5300, 6790]
    level_db, t60_s = -28.5, 0.51
    age = np.maximum(T - BLOW_S, 0)
    loose = grit(2.5, 90, 0.65)
    pieces = sum(resonance(loose, hz, 70) for hz in jangle_hz)
    envelope = invert_db(level_db - 60 * age / t60_s) * (1 - np.exp(-age / .004))
    return envelope * rms_one(band(loose, 2270, 5300) + 2.3 * pieces)


def dragged_tool():
    # (time [s], level [dB])
    drag = [(8.3, -82), (8.486, -60), (8.66, -50), (8.74, -45), (8.8, -40), (8.82, -30)]
    within = np.clip(np.minimum(T - drag[0][0], drag[-1][0] - T) * 20, 0, 1)
    return invert_db(in_time(drag)[0]) * within * rms_one(band(grit(2.2, 164, 1.1), 610, 2700))


def workshop(x):
    age = T[:SR]
    early, late = rng.standard_normal((2, 2, SR))
    tail = invert_db(-25.0 - 60 * age / 0.15) * early + invert_db(-41.0 - 60 * age / 0.77) * band(late, 700, 7700)
    tail = tail * (1 - np.exp(-age / 0.001))
    size = next_fast_len(N + SR)
    return irfft(rfft(x, size) * rfft(tail, size), size)[:, :N]


def shop_floor():
    # (frequency [Hz], density [dB per Hz])
    shop_colour = [(20, -6.5), (44, -1.5), (120, -13.5), (205, -11), (330, -13), (500, -16), (760, -22.5),
                   (900, -23), (1000, -22.5), (2700, -23.5), (6000, -25.5), (10300, -26.5)]
    # (frequency [Hz], width [Hz], level [dB])
    shop_hum = [(199.5, 2.5, -72), (500.6, 2, -76), (899, 2.5, -78)]
    # (frequency [Hz], width [Hz], level [dB])
    mic_whistle = (7900, 200, -73)
    shop = irfft(two_ports(invert_db(at_hz(shop_colour, HZ)), 0.67), N)
    whistle_hz, whistle_width_hz, whistle_db = mic_whistle
    out = invert_db(-57) * mid_rms_one(shop) + ringing(whistle_db, whistle_hz, whistle_width_hz, .1)
    return out + sum(ringing(db, hz, width_hz, .3) for hz, width_hz, db in shop_hum)


def scene():
    # (time [s], speed [0-1], motor current [0-1])
    spindle = [(0, 1, 1), (6.065, 1, 1), (6.085, .985, 0), (6.2, .895, 0), (6.42, .76, 0), (6.6, .63, 0),
               (6.9, .44, 0), (7.7, .02, 0), (10, .02, 0)]
    # (time [s], strength [dB], bite [dB])
    backlash = [(0, 1, 0), (.6, 0.5, -0.5), (6.05, 0.5, -0.5), (6.17, -2, -0.5), (6.3, 0.5, -1.5),
                (6.51, 1.5, 0.5), (6.56, -2, -0.5), (6.78, -4.5, -2.5), (6.85, -6, -0.5), (6.875, -6, 1.5),
                (6.98, -1, 0), (7.15, -1, -1.5), (7.22, -8.5, -1), (7.36, -12, -1), (7.8, -26.5, -0.5),
                (8.2, -34, -6)]
    speed, current = in_time(spindle)
    turn = np.cumsum(speed) / SR
    strength_db, bite_db = in_time(backlash)
    strength_db = strength_db - 20 * np.maximum(T - 8.2, 0) / 0.23
    rattle_lift_db, *wheel_lifts_db = surges()
    gears = rattle(turn, strength_db, bite_db, rattle_lift_db) + wheels(speed, strength_db, bite_db, wheel_lifts_db)
    lathe = whine(turn, current) + coasting(turn, speed) + gears + brake() + bench(strength_db, bite_db)
    hits = levers() + caliper() + hand_wheel() + tray()
    blow = tool_bodies() + settling_rod() + clank()
    near = (hits + blow) * invert_db([[-1.5], [1.3]])
    return lathe + near + jangle() + dragged_tool() + workshop(hits) + shop_floor()


def roll_off(x):
    return signal.sosfilt(signal.butter(12, 10480, fs=SR, output="sos"), x)


def record(dry):
    rounded = 1.503 * np.tanh(dry / 1.522)
    cut = signal.ellip(10, .3, 70, 9950, fs=SR, output="sos")
    return roll_off(signal.sosfilt(cut, rounded))


dry = scene()
out = record(dry)
put_to_file(out)
```